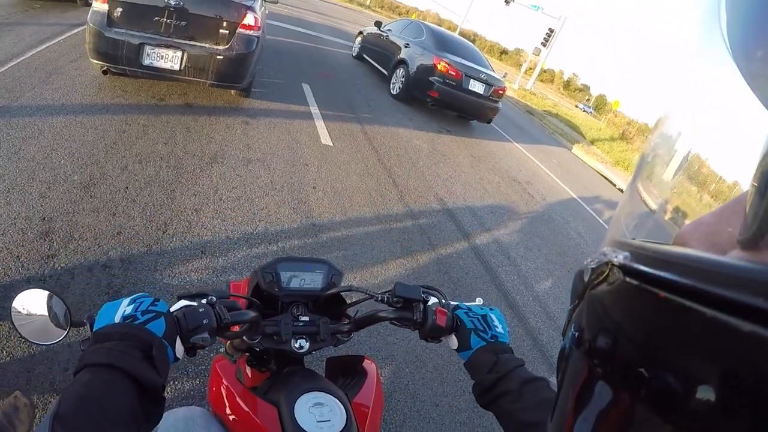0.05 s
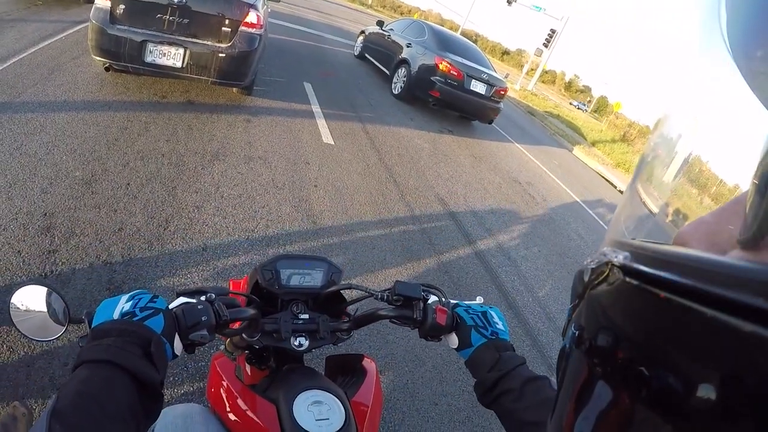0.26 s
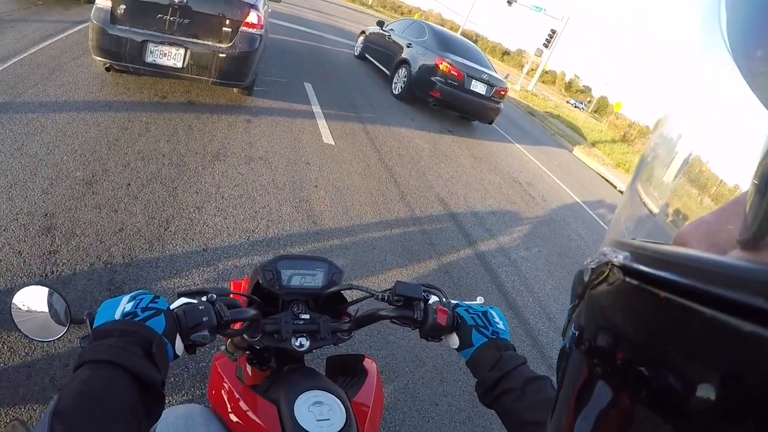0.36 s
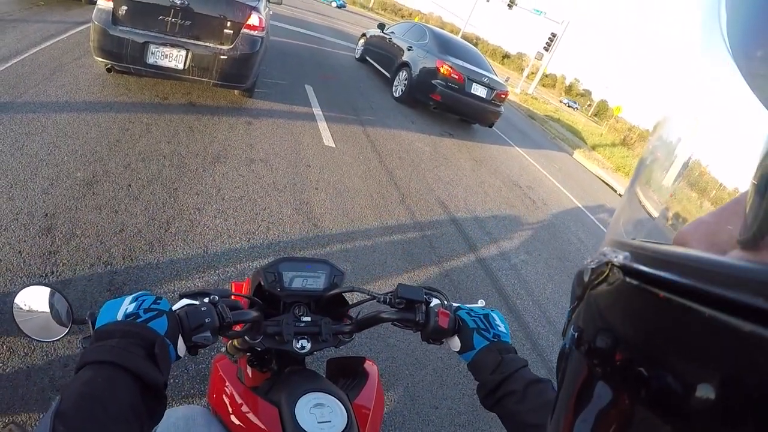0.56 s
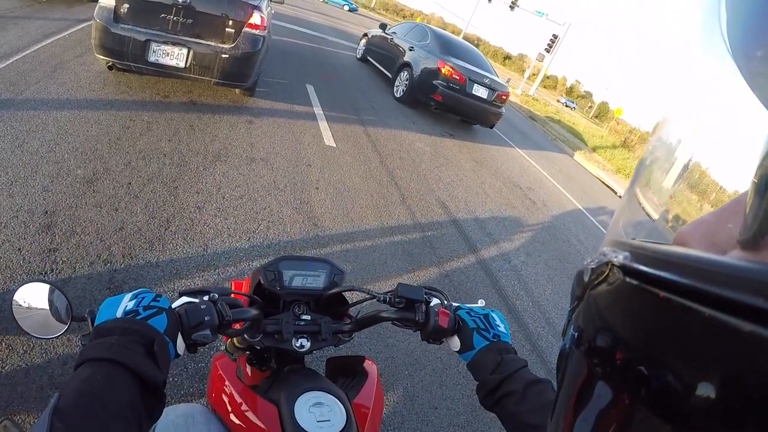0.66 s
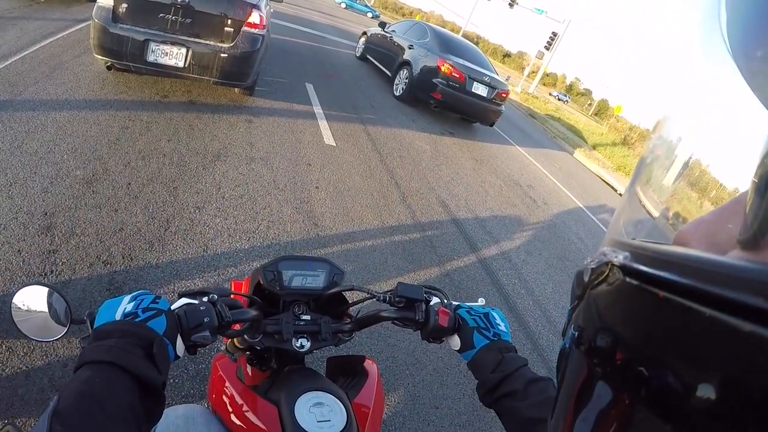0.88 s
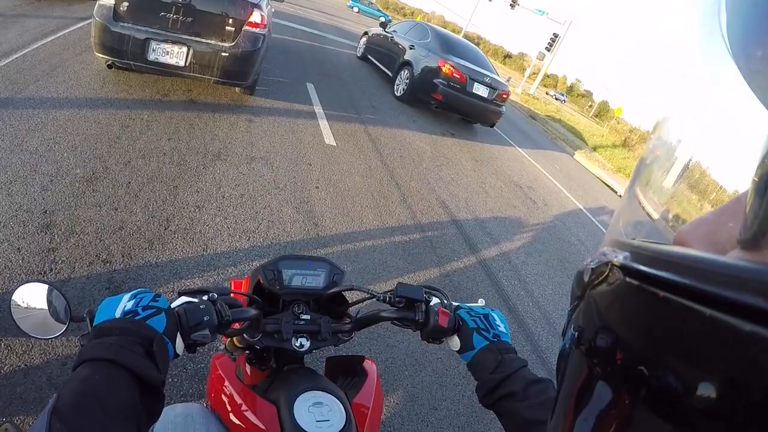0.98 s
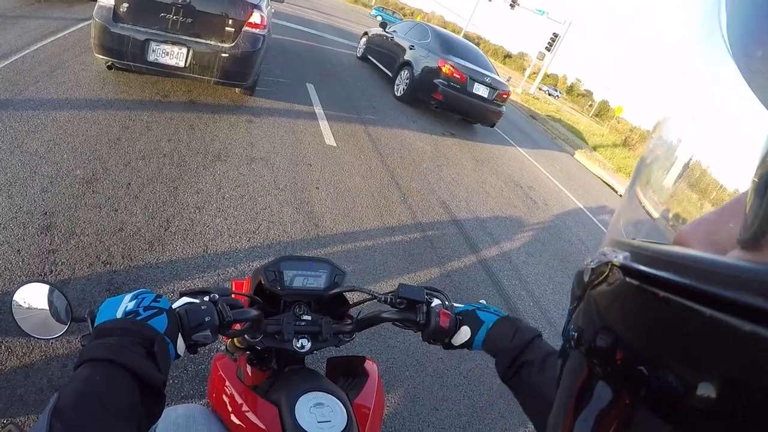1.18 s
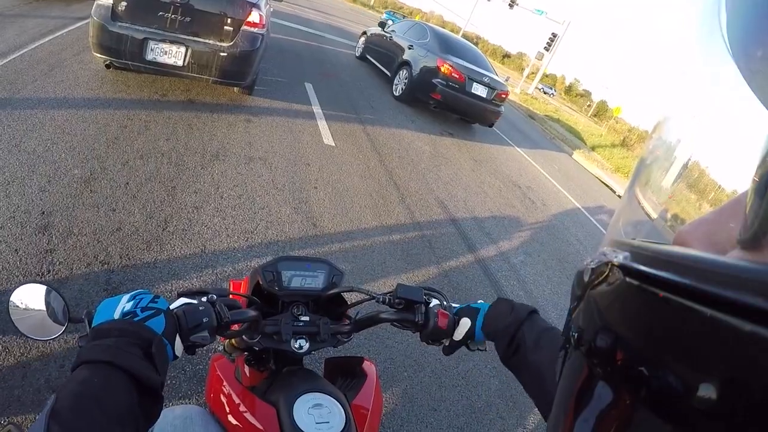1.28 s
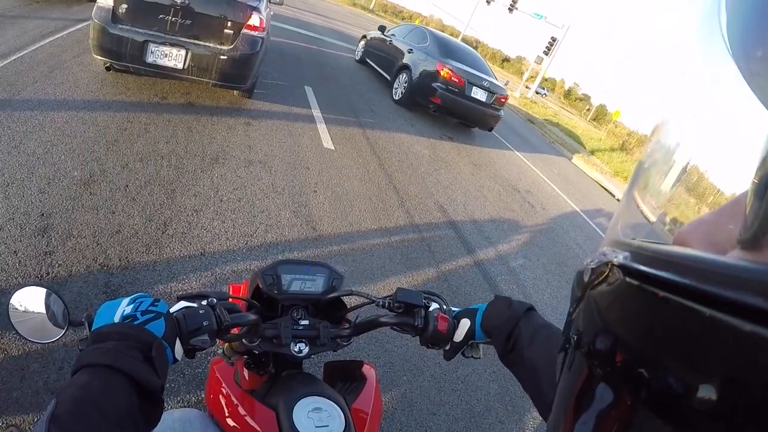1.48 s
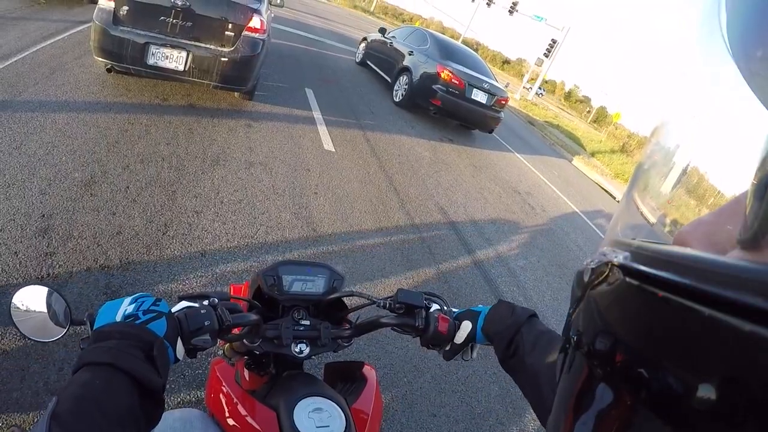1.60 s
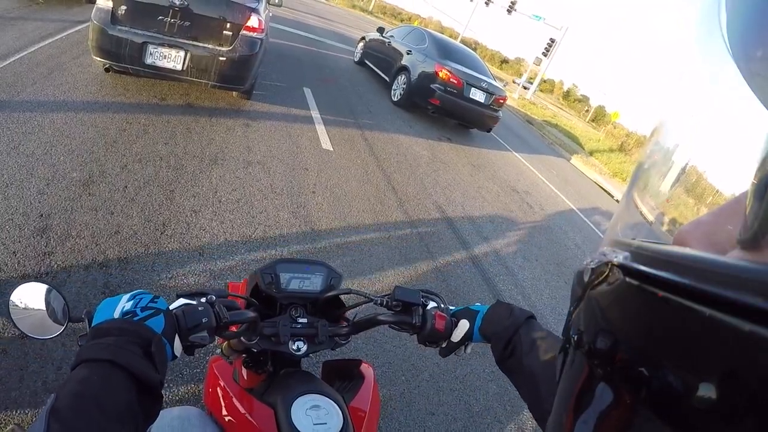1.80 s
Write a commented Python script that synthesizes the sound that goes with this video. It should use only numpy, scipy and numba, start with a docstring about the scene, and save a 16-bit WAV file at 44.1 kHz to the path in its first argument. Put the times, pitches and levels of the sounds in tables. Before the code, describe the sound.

A small single-cylinder motorcycle starts at a soft, slow idle over faint traffic rumble. From about 0.2 s its pulses quicken and swell into a raspy, hollow buzz, reaching full loudness near 0.6 s. From 0.64 to 1.45 s it bounces five times on the limiter, pitch wobbling slightly. Then the throttle closes and it drops to a quieter, slowly falling whirr with mechanical clatter until 1.85 s. Close, muffled, with short echoes.

```python
"""A small single-cylinder motorcycle rises from idle over low traffic rumble, heard muffled by a helmet camera.
As it revs up, firing pulses ring the pipe and bodywork, and intake gulps ring the air box. Gas hiss puffs once a
cycle, valve clatter rings the case, the crank hums at fixed orders, and near cars return short echoes.
From about 0.64 s it bounces five times on its rev limiter, each fuel cut changing the balance of the modes.
From about 1.45 s it is let go and slows. The camera's two close ports hear slightly different sound."""
import sys
import numpy as np
from scipy import signal
from scipy.fft import rfft, irfft
from scipy.io import wavfile
from scipy.ndimage import uniform_filter1d
from numba import njit

SR = 44100
rng = np.random.default_rng(int(sys.argv[2]) if len(sys.argv) > 2 else 0)


def gain_from_db(level_db):
    """Turn a decibel level (scalar or array-like) into a linear amplitude factor."""
    decades = np.asarray(level_db, float) / 20
    return 10 ** decades


def waveform_to_disk(signal):
    """Save audio, clipped to [-1, 1], as 16-bit WAV at the path in sys.argv[1]."""
    frames = np.transpose(np.atleast_2d(signal))
    scaled = np.clip(frames, -1, 1) * 32767
    samples = np.round(scaled).astype(np.int16)
    wavfile.write(sys.argv[1], SR, samples)


N = 81585

# Engine speed: (time [s], firing rate [cycles/s])
ENGINE_SPEED = [(0, 15), (.12, 21), (.2, 29), (.25, 35.5), (.3, 41), (.34, 44.8), (.4, 52.3), (.44, 58),
                (.5, 66), (.56, 72), (.6, 75.5), (.635, 78.5), (.665, 77.3), (.715, 79.0), (.843, 75.2),
                (.89, 78.6), (1.012, 75.6), (1.065, 78.7), (1.187, 75.4), (1.242, 78.5), (1.365, 75.4),
                (1.445, 78.7), (1.52, 75.8), (1.644, 71.2), (1.754, 68.0), (1.85, 65.6)]
# Throttle hand: (time [s], exhaust [dB], intake [dB], air-box pitch [Hz], air-box width [Hz], gas hiss [dB]),
# the levels relative
THROTTLE_HAND = [(0, -29, -35, 242, 38, -68), (.07, -40, -33.5, 261, 67, -52),
                 (.15, -45.5, -32, 256, 100, -65.5), (.19, -31.5, -21, 258, 34, -54.5),
                 (.33, -18.5, -18, 253.4, 58, -40.5), (.42, -11.5, -16, 293.6, 100, -40.5),
                 (.5, -11.5, -12.5, 273, 71, -36), (.6, -5, -6.5, 229.3, 18.4, -34),
                 (.7, -5, -8.5, 231, 13, -32), (1.33, -5, -8.5, 229.9, 8.0, -33),
                 (1.375, -5, -10.5, 294.4, 28, -37.5), (1.43, -7.5, -9, 316.5, 19, -33.5),
                 (1.46, -13.5, -24, 329, 36, -36), (1.51, -41.5, -24, 301.2, 24, -35),
                 (1.57, -25.5, -21, 302.8, 14, -31.5), (1.63, -57, -35, 285, 32, -33),
                 (1.68, -41, -37, 309, 118, -37.5), (1.85, -30.5, -33, 307.6, 40, -39.5)]
# Pipe and bodywork modes: (frequency [Hz], relative level [dB], t60 [s], change with the fuel cut [dB])
PIPE_MODES = [(268, -17.5, 0.017, 0), (307.6, -8, 0.2, 0), (345, -12.5, 0.025, 2), (374, -1, 0.2, -6),
              (385.2, 6, 0.13, -5.5), (441.5, 6, 0.056, 3), (564.4, 0.5, 0.026, 4), (620.5, -3, 0.13, -8.5),
              (661.6, -2, .07, -6.5), (730, -11, 0.017, 1.5), (771.7, -5.5, 0.058, 1.5),
              (920.5, -6, 0.087, -3.5), (1264, -14, 0.034, 2), (1570, -18.5, 0.047, -2.5),
              (1936, -17, 0.015, 8)]
# Path time of each pipe mode, in the same order: (delay [s])
MODE_DELAYS = [.00076, .003, .00094, .004, .004, .0059, .0062, .0058, .00635, .0066, .0066, .003, .0053,
               .00086, .003]
# Air rush in the box against the gulps: (time [s], relative level [dB])
RUSH_LEVEL = [(0, -3.5), (.3, -1), (.45, -8), (.6, -3.5), (1.48, -4), (1.52, -11.5), (1.85, -5.5)]
# Bright gas hiss: (frequency [Hz], relative density [dB per Hz])
HISS_SPECTRUM = [(300, -34), (600, -4), (760, -4.5), (850, -7), (1050, -6.5), (1400, -11), (1750, -13),
                 (1960, -14.5), (2200, -14.5), (2600, -17), (3300, -17.5), (4200, -47.5)]
# Low gas roar: (frequency [Hz], relative density [dB per Hz])
ROAR_SPECTRUM = [(120, -40), (200, -25.5), (300, -23), (540, -11), (700, -7.5), (850, -7.5), (1100, -36),
                 (1600, -48.5)]
# Piston, valve gear and engine case modes: (frequency [Hz], level at top speed [dB], t60 [s])
CASE_MODES = [(332, -40, 0.01), (398, -28, 0.0083), (540, -44.5, .025), (765, -37, 0.044),
              (970, -48.5, 0.034), (1125, -58, 0.041), (1440, -57.5, 0.021), (1710, -61, 0.019),
              (1935, -42.5, 0.029), (2310, -41, .03), (2590, -39.5, .03), (3045, -38, 0.013),
              (3410, -42, 0.027)]
# Knocks of piston and valves: (place in the cycle [share])
KNOCKS_AT = (0.24, 0.8)
# Crank shake carried by the frame: (multiple of the cycle rate [1])
SHAKE_ORDERS = (2, 5, 6, 8, 12, 14)
# The same orders: (mean level at top speed [dB rms])
SHAKE_LEVELS = [-54, -39.5, -37, -43.5, -48, -52.5]
# Echoes from cars and road: (delay [s], level [dB])
ECHO_PATHS = [(.0071, -14.5), (.017, -14.5), (0.03, -15)]
# Traffic and frame shake: (frequency [Hz], relative density [dB per Hz])
RUMBLE_SPECTRUM = [(25, -19), (60, -19.5), (105, -4), (125, -4.5), (160, -14), (250, -4), (500, -20.5),
                   (900, -43)]
# Traffic and frame shake: (time [s], mean level [dB])
RUMBLE_COURSE = [(0, -37), (.13, -49), (.25, -48.5), (.62, -35.5), (1.35, -38.5), (1.52, -60), (1.68, -55),
                 (1.85, -35.5)]
# Self-noise of the camera: (frequency [Hz], relative density [dB per Hz])
SELF_NOISE_SPECTRUM = [(3500, -17.5), (6000, -5.5), (10000, -4), (13500, -4), (15100, 1), (15500, -37.5)]
# Tick of the camera: (frequency [Hz], relative density [dB per Hz])
TICK_SPECTRUM = [(12000, -29.5), (14300, -10.5), (15100, 0.5), (15500, -18)]

CUT_SMOOTH_S = 0.0097
FIRING_SPREAD_DB, FIRING_JITTER_S = 1.2, .00006
# Gulp: share of the cycle after the firing, then shift [cycles] and level change [dB] with the fuel cut
GULP_AT, GULP_CUT_SHIFT, GULP_CUT_DB = .45, -0.11, -6
GULP_SOFT_HZ, GULP_FULL_PER_S = 420, 75  # gulps are soft puffs; the second number sets their weight, the same at every speed
BOX_RUSH_DB, BOX_RUSH_WIDTH_HZ = 11.5, 101  # the rush is full when the box is damped this much
RELIGHT_DIP_DB, RELIGHT_S = -2.5, 0.085
HISS_GATE, HISS_GATE_CUT = .75, .45  # puffing share while firing and with the fuel cut
HISS_SHARPNESS, HISS_FLICKER_DB = 1.9, 1.92
ROAR_DB = -23.5  # against the exhaust level
PORT_NOISE_DB, PORT_LAG_S = -21, .000125
DIP_HZ, DIP_WIDTH_HZ = 851, 73  # the gas sound cancels here
CASE_DB_PER_OCTAVE, CRANK_DB_PER_OCTAVE = 17, 9  # per octave of engine speed
CRANK_WAVER_DB, CRANK_WAVER_HZ = 3.5, 9
LOW_CUT_HZ, MUFFLE_HZ = 189, 4320
SELF_NOISE_DB, NOISE_SINKS = -72, .3  # level at a loudness of -22.5 dB; dB lost per dB of loudness
TICKS_PER_S, TICK_AT_S = 59.94, .0055
TICK_DECAY_S, TICK_DB, TICK_LEFT_DB = .002, 13.5, -5.5  # peak against the self-noise; left against right


def rms_one(x):
    """Normalisation: scales a signal to unit root-mean-square amplitude."""
    return x / np.sqrt(np.mean(x ** 2) + 1e-20)


def in_time(rows):
    """Linear interpolation: draws each column of a time table as a continuous curve."""
    s, *columns = np.transpose(rows)
    return [np.interp(np.arange(N) / SR, s, c) for c in columns]


def coloured(spectrum, count):
    """Spectral shaping: white noise weighted by a (Hz, dB) table, with unit rms."""
    hz, db = np.transpose(spectrum)
    f = np.maximum(np.arange(N // 2 + 1) * SR / N, 1)
    gain = gain_from_db(np.interp(np.log(f), np.log(hz), db))
    return rms_one(irfft(rfft(rng.standard_normal((count, N))) * gain, N))


def drift(rate):
    """Low-pass filtering: white noise through a double pole leaves a slow random course of unit rms."""
    r = np.exp(-2 * np.pi * rate / SR)
    course = signal.lfilter([1], [1, -2 * r, r * r], rng.standard_normal(N + SR))
    return rms_one(course[SR:])  # the filter has settled by then


def pulses(cycles, offset):
    """Periodic excitation: one impulse per cycle, a little uneven in time and size."""
    jitter, spread = rng.standard_normal((2, 200))
    at = np.interp(np.arange(200) + offset, cycles, np.arange(N), right=N + 99)
    at = np.clip(at + FIRING_JITTER_S * SR * jitter, 0, N + 1)
    size = gain_from_db(FIRING_SPREAD_DB * spread)
    whole, out = at.astype(int), np.zeros(N + 3)
    # a click between two samples is shared by both
    np.add.at(out, whole, size * (1 - at + whole))
    np.add.at(out, whole + 1, size * (at - whole))
    return out[:N] + 1e-18


def ring(clicks, hz, t60):
    """Damped free vibration: a unit impulse starts a decaying sine of about unit height."""
    r, w = gain_from_db(-60 / (t60 * SR)), 2 * np.pi * hz / SR
    return signal.lfilter([0, np.sin(w)], [1, -2 * r * np.cos(w), r * r], clicks)


@njit
def moving_ring(x, turn, r):
    """Time-varying resonance: a rotating phasor whose pitch and damping change sample by sample."""
    out, state = np.zeros(len(x)), 0j
    for i in range(len(x)):
        state = state * r[i] * np.exp(1j * turn[i]) + x[i] * (1 - r[i])
        out[i] = state.imag
    return out


def camera_noise(muffled):
    """Additive self-noise: a faint hiss and a regular high tick, both sinking as the sound gets loud."""
    loud_db = 10 * np.log10(uniform_filter1d(muffled[0] ** 2, size=8000) + 1e-9)
    since = (np.arange(N) / SR - TICK_AT_S) % (1 / TICKS_PER_S)
    tick = coloured(TICK_SPECTRUM, count=1) * np.exp(-since / TICK_DECAY_S)
    tick = tick * gain_from_db(TICK_DB + np.array([[TICK_LEFT_DB], [0]]))
    level_db = SELF_NOISE_DB - NOISE_SINKS * (loud_db + 22.5)
    return (coloured(SELF_NOISE_SPECTRUM, count=2) + tick) * gain_from_db(level_db)


def traffic_rumble():
    """Broadband low-frequency noise: traffic and frame shake follow a level course with a slow waver."""
    level_db = in_time(RUMBLE_COURSE)[0] + 0.97 * drift(5.7)
    return coloured(RUMBLE_SPECTRUM, count=1)[0] * gain_from_db(level_db)


def echoes(sound):
    """Specular reflection: cars and road return delayed, weaker copies of the sound."""
    n = np.arange(N)
    return sum(gain_from_db(db) * np.interp(n - s * SR, n, sound, left=0) for s, db in ECHO_PATHS)


def crank(cycles, speed):
    """Forced vibration: sines at orders of the crank waver gently and fade as the engine slows."""
    speed_db = CRANK_DB_PER_OCTAVE * np.log2(speed / speed.max())
    total = np.zeros(N)
    for k, db in zip(SHAKE_ORDERS, SHAKE_LEVELS):
        level_db = db + speed_db + CRANK_WAVER_DB * drift(CRANK_WAVER_HZ)
        total += np.sqrt(2) * np.sin(2 * np.pi * k * cycles) * gain_from_db(level_db)
    return total


def valves(cycles, speed):
    """Impact excitation: piston and valves knock twice a cycle and ring the case, louder with speed."""
    taps = sum(pulses(cycles, at) for at in KNOCKS_AT)
    taps = taps * gain_from_db(CASE_DB_PER_OCTAVE * np.log2(speed / speed.max()))
    total = np.zeros(N)
    for k, (hz, db, t60) in enumerate(CASE_MODES):
        total += (-1) ** k * ring(taps * gain_from_db(db), hz, t60)
    return total


def hiss(cycles, fuel_cut, level_db, exhaust_db):
    """Modulated flow noise: bright hiss and low roar puff once a cycle; a part differs between the ports."""
    share = HISS_GATE + (HISS_GATE_CUT - HISS_GATE) * fuel_cut
    puff = rms_one(np.exp(-HISS_SHARPNESS * ((cycles + .5) % 1)))
    gate = (1 - share + share * puff) * gain_from_db(HISS_FLICKER_DB * drift(3.3))
    shared, apart = coloured(HISS_SPECTRUM, count=2) * gate * gain_from_db(level_db - 1.0)
    roar = coloured(ROAR_SPECTRUM, count=1)[0] * gate * gain_from_db(exhaust_db + ROAR_DB)
    return shared + roar, apart * gain_from_db(PORT_NOISE_DB)


def intake(cycles, fuel_cut, level_db, box_hz, width_hz):
    """Cavity resonance: gulps and air rush ring the air box, whose pitch and damping follow the throttle."""
    width_hz = np.maximum(width_hz, 2)
    gulps = pulses(cycles + GULP_CUT_SHIFT * fuel_cut, .5 + GULP_AT)
    gulps = gulps * gain_from_db(GULP_CUT_DB * fuel_cut) * SR / GULP_FULL_PER_S
    gulps = signal.sosfilt(signal.butter(4, GULP_SOFT_HZ, fs=SR, output="sos"), gulps)
    # the rush grows with the damping of the box
    rush = rng.standard_normal(N) * gain_from_db(BOX_RUSH_DB) * np.sqrt(SR * width_hz / np.pi) / BOX_RUSH_WIDTH_HZ
    rush = rush * gain_from_db(in_time(RUSH_LEVEL)[0])
    box = moving_ring((gulps + rush) * gain_from_db(level_db), 2 * np.pi * box_hz / SR, np.exp(-np.pi * width_hz / SR))
    # the air box falters around each return of the fuel
    span = int(RELIGHT_S * SR) + 1
    relight = uniform_filter1d(np.maximum(-np.gradient(fuel_cut), 0), span)
    relight = uniform_filter1d(relight, span // 2 + 1) * span
    return gain_from_db(RELIGHT_DIP_DB * relight) * box


def exhaust(cycles, fuel_cut, level_db):
    """Modal superposition: pulses ring the pipe modes after their own paths; a fuel cut reweights them."""
    clicks = pulses(cycles, .5) * gain_from_db(level_db)
    total = np.zeros(N)
    for (hz, db, t60, cut_db), late_s in zip(PIPE_MODES, MODE_DELAYS):
        drive = clicks * gain_from_db(db - 14.5 + cut_db * fuel_cut)
        total += ring(np.roll(drive, int(late_s * SR)), hz, t60)
    return total


def scene():
    """Linear superposition: the sources add up and reach two ports with a small lag between them."""
    speed, = in_time(ENGINE_SPEED)
    exhaust_db, intake_db, box_hz, width_hz, hiss_db = in_time(THROTTLE_HAND)
    cycles = np.cumsum(speed) / SR
    falling = 1. * (np.gradient(speed) < 0)  # the fuel is cut on every fall of speed
    fuel_cut = uniform_filter1d(falling, int(CUT_SMOOTH_S * SR) + 1)

    shared_hiss, apart = hiss(cycles, fuel_cut, hiss_db, exhaust_db)
    gas = exhaust(cycles, fuel_cut, exhaust_db) + shared_hiss
    gas = signal.lfilter(*signal.iirnotch(DIP_HZ, DIP_HZ / DIP_WIDTH_HZ, SR), gas)
    bike = gas + intake(cycles, fuel_cut, intake_db, box_hz, width_hz) + valves(cycles, speed)
    bike = bike + echoes(bike)
    bike = signal.sosfilt(signal.butter(10, LOW_CUT_HZ, "high", fs=SR, output="sos"), bike)
    heard = bike + crank(cycles, speed) + traffic_rumble()

    lag = np.exp(-2j * np.pi * np.arange(N // 2 + 1) * SR / N * PORT_LAG_S)
    ports = np.array([irfft(rfft(heard) * lag, N), heard])  # the left port hears later
    # the unshared hiss is differenced, which brightens it, and has opposite signs at the ports
    return ports + signal.lfilter([1, -1], [1], apart) * [[1], [-1]]


def roll_off(x):
    """The treble ends steeply here."""
    return signal.sosfilt(signal.butter(12, 15330, fs=SR, output="sos"), x)


def record(dry):
    """Low-pass filtering: the treble is cut steeply, then the camera's own noise is added."""
    muffled = signal.sosfilt(signal.cheby2(14, 70, MUFFLE_HZ, fs=SR, output="sos"), dry)
    mix = muffled + camera_noise(muffled)
    return roll_off(mix)


dry = scene()
out = record(dry)
waveform_to_disk(out)
```